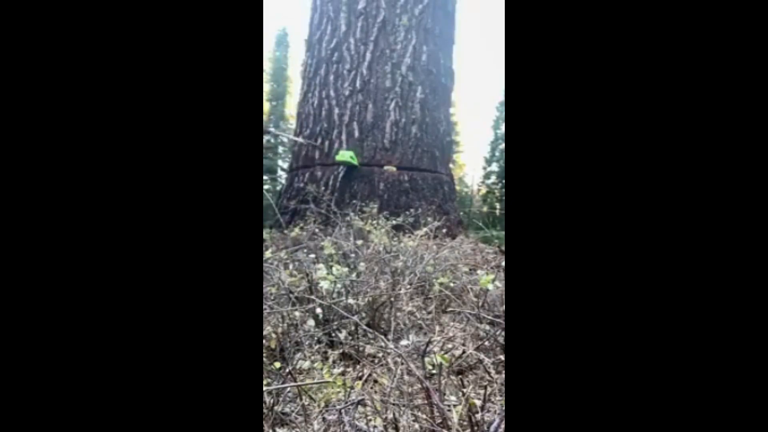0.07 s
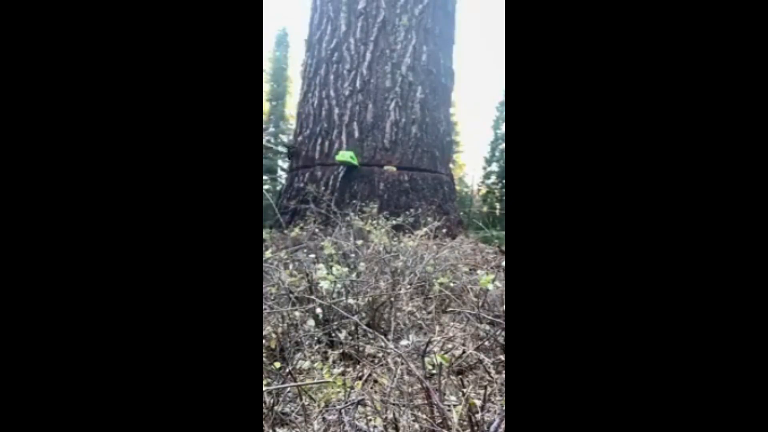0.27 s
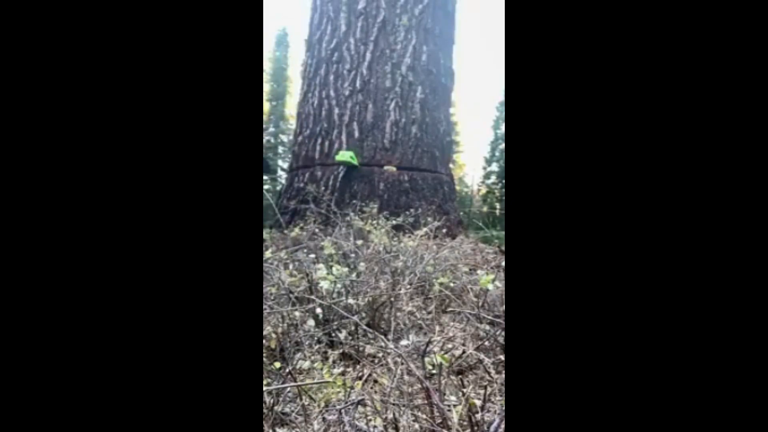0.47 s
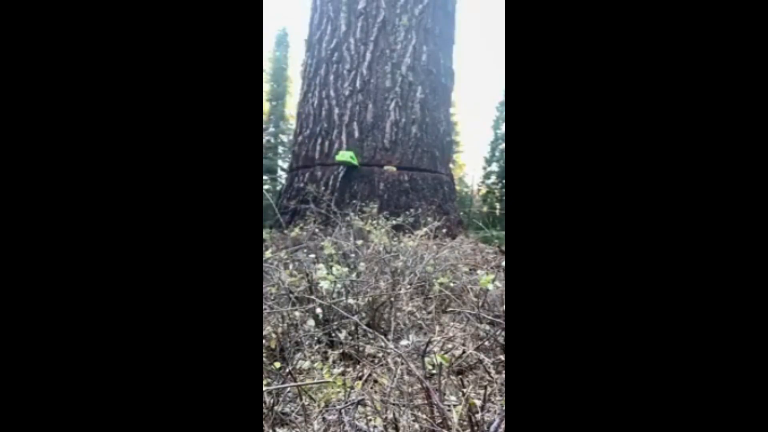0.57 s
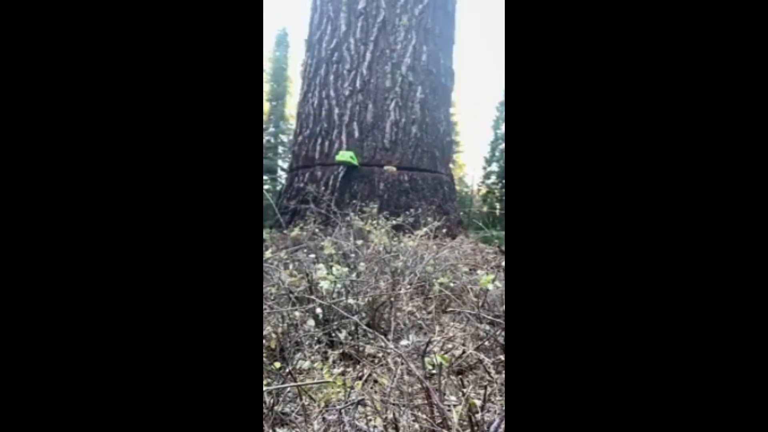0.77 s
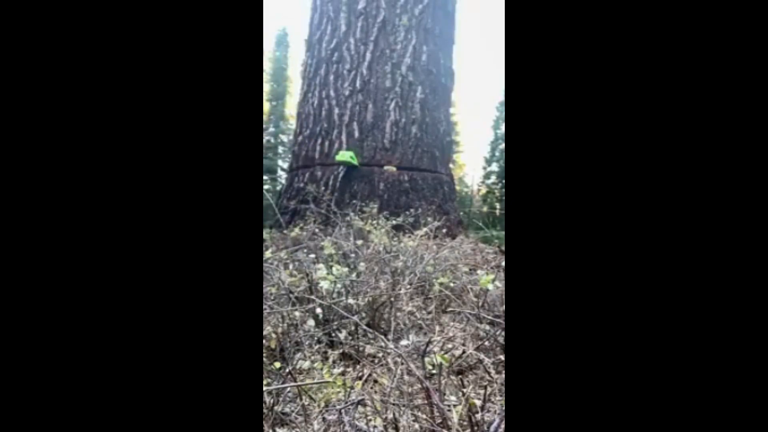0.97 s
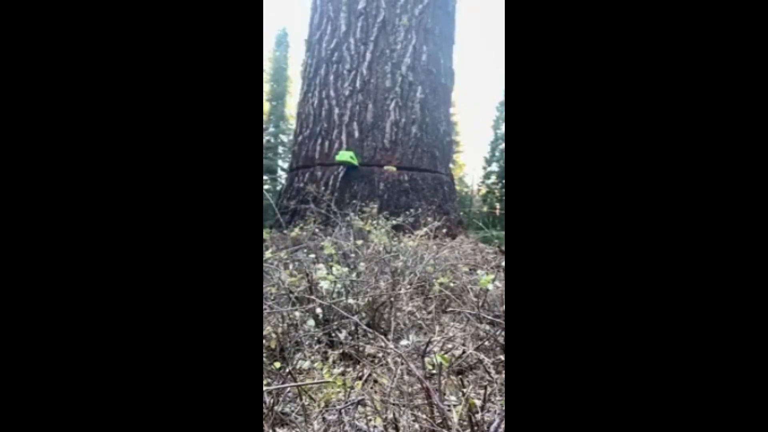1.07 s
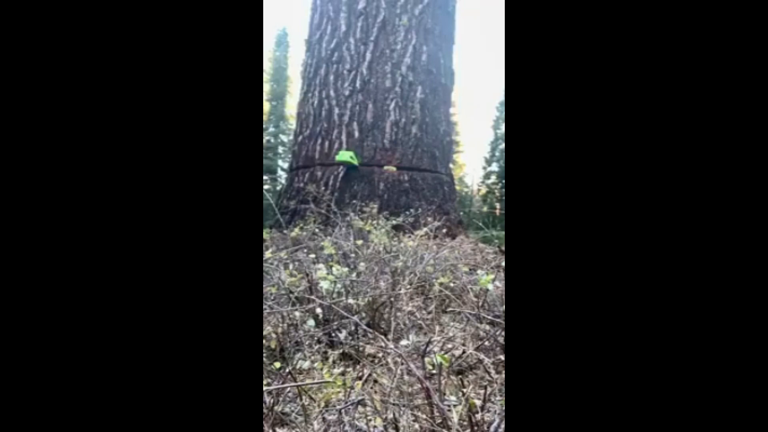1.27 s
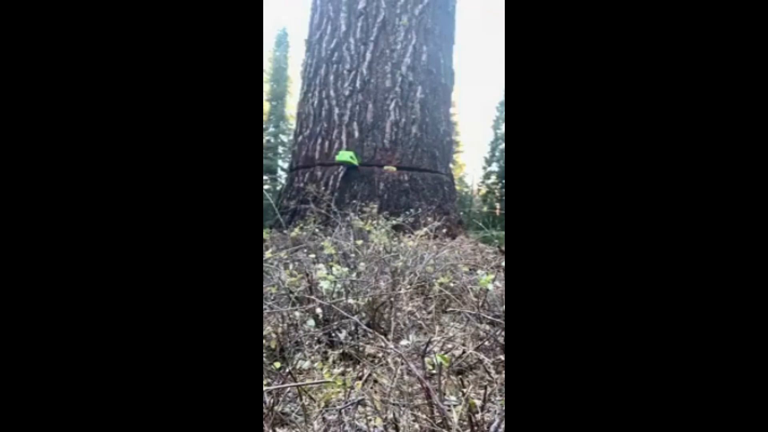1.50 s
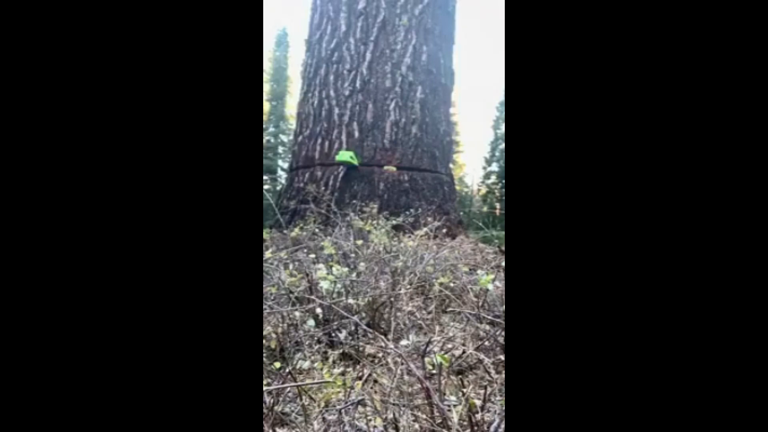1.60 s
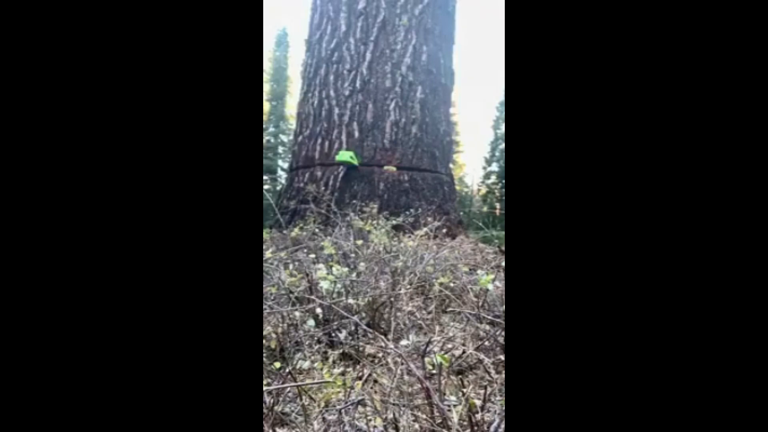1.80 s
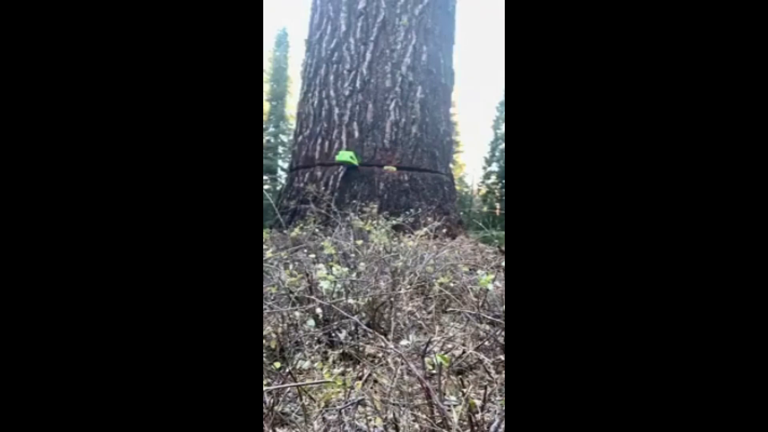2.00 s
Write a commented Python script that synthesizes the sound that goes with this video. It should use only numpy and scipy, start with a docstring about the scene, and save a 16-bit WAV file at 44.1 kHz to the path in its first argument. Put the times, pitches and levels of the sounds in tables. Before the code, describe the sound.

Outdoors in quiet forest, one loud metallic whack pounds a wedge into a saw cut, with woody knock and low thud. The echo fades over about a second, then nearby rustling, small knocks and a twig snap follow.

```python
"""Axe blow on a felling wedge

One hard axe blow drives a wedge into the saw cut of a big tree. Decaying sine modes make the ringing
steel, the hollow knock of the trunk and the deep thump; shaped noise bursts make the wedge bite and judder.
Decaying noise convolved with the blow gives the forest echo. Then brush and clothing rustle nearby as
swelling noise, with a few resonant knocks and a twig snap, over quiet air."""
import sys
import numpy as np
from scipy import signal
from scipy.fft import rfft, irfft, next_fast_len
from scipy.io import wavfile
from scipy.ndimage import map_coordinates

SR = 44100
rng = np.random.default_rng(int(sys.argv[2]) if len(sys.argv) > 2 else 0)


def file_out(sig):
    """Save sig as 16-bit WAV at sys.argv[1]."""
    # one column per channel
    cols = np.atleast_2d(sig).T
    # limit, then scale
    lim = np.clip(cols, -1, 1)
    pcm = np.round(lim * 32767).astype(np.int16)
    wavfile.write(sys.argv[1], SR, pcm)


N = 90404
T = np.arange(N) / SR  # s
BLOW_S = 0.229  # the head meets the wedge
SNAP_S = 1.4848  # the twig breaks

# Head driving the wedge in. Each row: start in seconds, relative level in dB.
BITES = [(.2275, -25), (.233, -8.5), (.239, -3.5), (.243, -0.5), (.2487, 4), (.252, 2)]
# Strokes of rustling brush and clothing. Each row: peak, rise width and fall width in seconds,
# hiss level and dull scuff level in dB.
RUSTLES = [(0.817, .035, 0.057, -58.5, -66), (1.05, 0.06, 0.056, -62, -61.5),
           (1.159, 0.025, 0.034, -65.5, -58.5), (1.29, 0.11, .06, -63, -74),
           (1.425, 0.036, 0.021, -50.5, -51), (1.518, 0.027, 0.08, -49, -44.5),
           (1.643, 0.045, 0.046, -46, -44.5), (1.743, 0.01993, .055, -62.5, -60),
           (1.94, 0.0154, 0.023, -61, -68), (1.995, 0.0126, 0.04, -50, -59.5),
           (2.034, 0.0182, 0.031, -53.5, -45)]


def amp(db):
    """Decibels to gain."""
    return 10 ** (np.asarray(db) / 20)


def unit(x):
    """Scale to rms 1."""
    return x / np.sqrt(np.mean(np.abs(x) ** 2) + 1e-20)


def along(points, hz):
    """Interpolate (Hz, value) points on a log frequency axis."""
    point_hz, value = np.transpose(points)
    return np.interp(np.log(hz + 1), np.log(point_hz + 1), value)


def wobble(knots_per_s):
    """Smooth random curve through normally distributed knots."""
    return map_coordinates(rng.standard_normal(4096), [T * knots_per_s], mode="wrap")


def filtered(x, response):
    """Multiply the spectrum of x by a response of frequency, zero-padded."""
    size = next_fast_len(N + SR // 2)
    spectrum = rfft(x, size) * response(np.fft.rfftfreq(size, 1 / SR))
    return irfft(spectrum, size)[:N]


def noise(colour):
    """Noise of rms 1 with a (Hz, dB) spectrum."""
    return unit(filtered(rng.standard_normal(N), lambda hz: amp(along(colour, hz))))


def resonate(x, hz, q):
    """Pass x twice through one broad resonance, then scale to rms 1."""
    def response(f):
        damping = 1j * f * hz / q
        return (damping / (hz * hz - f * f + damping)) ** 2

    return unit(filtered(x, response))


def envelope(start_s, attack_s, hold_s, t60_s):
    """Straight rise, hold, exponential release."""
    t = T - start_s
    rise = np.clip(t / attack_s, 0, 1)
    return rise * amp(-60 * np.maximum(t - attack_s - hold_s, 0) / t60_s)


def ring(modes, start_s, attack_s, hold_s, waver_rad, waver_per_s):
    """Decaying sine modes (Hz, dB, t60 s) whose phases waver at random."""
    total = 0
    for hz, db, t60_s in modes:
        cycles = hz * (T - start_s) + rng.random()
        phase = 2 * np.pi * cycles + waver_rad * wobble(waver_per_s)
        total = total + amp(db) * envelope(start_s, attack_s, hold_s, t60_s) * np.sin(phase)
    return total


def cracks(rows, t60_s, attack_s):
    """Joint envelope of a run of short cracks, summed in power."""
    power = sum((amp(db) * envelope(s, attack_s, 0.0013, t60_s)) ** 2 for s, db in rows)
    return np.sqrt(power)


def strokes(levels_db):
    """Gain that swells and fades as a lopsided bell with each stroke of movement."""
    power = 0
    for (peak_s, rise_s, fall_s, *_), db in zip(RUSTLES, levels_db):
        width_s = np.where(T < peak_s, rise_s, fall_s)
        power = power + amp(db) ** 2 * np.exp(-((T - peak_s) / width_s) ** 2)
    return np.sqrt(power)


def head_ring():
    """Steel axe head rings in short modes whose phases waver at random."""
    # Modes of the axe head. Each row: frequency in Hz, level in dB, t60 in seconds.
    head_modes = [(2007.5, -19.5, 0.02), (2381, -24.5, 0.093), (2690, -23.5, .05), (2720, -20, 0.071),
                  (2891, -20, 0.13), (3018, -18.5, .045), (3115, -15, .045), (3440, -24.5, .16),
                  (4750, -32, .08), (5230, -32.5, 0.027), (5690, -33, .05), (6260, -32, 0.04)]
    return ring(head_modes, BLOW_S, attack_s=0.012, hold_s=0.007, waver_rad=0.45, waver_per_s=200)


def wedge_ring():
    """Struck wedge rings in modes that mostly outlast those of the head."""
    # Modes of the wedge. Each row: frequency in Hz, level in dB, t60 in seconds.
    wedge_modes = [(1717, -30, 0.067), (1788, -32.5, 0.27), (1842, -25.5, .2), (1923, -24.5, 0.18),
                   (2063, -23, .16), (2287, -33, .12), (3550, -27.5, 0.092), (3946, -38, 0.19),
                   (3957, -38, 0.32)]
    return ring(wedge_modes, BLOW_S, attack_s=0.018, hold_s=0.03, waver_rad=0.25, waver_per_s=120)


def wedge_bite():
    """Head drives the wedge in: a run of noise cracks, each with a bright splintering edge."""
    # Spectrum of the bite. Each row: frequency in Hz, relative density in dB per Hz.
    bite_colour = [(59, -51.5), (100, -19), (253, -25.5), (640, -11.5), (936, -18.5), (1110, -10.5),
                   (1400, -29.5), (1800, -4), (2270, -10.5), (3050, -1), (4100, -17.5), (7100, -27),
                   (8230, -31), (9950, -26.5), (15500, -31)]
    # Spectrum of the bright edge. Each row: frequency in Hz, relative density in dB per Hz.
    splinter_colour = [(3900, -23.5), (4800, -0.5), (6200, 11), (10000, -7.5), (15000, -13)]
    bite = amp(-10) * cracks(BITES, t60_s=0.022, attack_s=0.0016) * noise(bite_colour)
    splinter = amp(-34) * cracks(BITES, t60_s=0.11, attack_s=0.0015) * noise(splinter_colour)
    return bite + splinter


def wedge_judder():
    """Wedge judders to rest in the wood: a run of sharp noise cracks."""
    # Jolts of the wedge. Each row: start in seconds, relative level in dB.
    jolts = [(.262, -8.5), (.2695, 3), (.274, -9.5), (.281, -0.5), (.285, 2.5), (.292, -0.5), (.298, -4)]
    # Spectrum of a jolt. Each row: frequency in Hz, relative density in dB per Hz.
    jolt_colour = [(59, -36), (100, -9), (326, -23.5), (654, -2), (879, -14), (1180, -18), (1340, -18.5),
                   (1920, -2), (2520, -13), (3690, -10), (4460, -28), (4860, -16.5), (5170, -23.5),
                   (7730, -25), (15500, -41)]
    return amp(-16) * cracks(jolts, t60_s=0.04, attack_s=0.00054) * noise(jolt_colour)


def trunk_knock():
    """Hollow trunk modes sound in rising order as the wedge tightens."""
    # Modes of the trunk. Each row: start in seconds, frequency in Hz, level in dB, t60 in seconds.
    trunk_modes = [(.262, 482, -33.5, 0.036), (.268, 559.8, -21, .08), (.27, 612, -30, 0.2),
                   (.276, 667.5, -20.5, .06), (.288, 726, -27.5, 0.027)]
    return sum(ring([mode], start_s, attack_s=0.0047, hold_s=0.02, waver_rad=0.25, waver_per_s=100)
               for start_s, *mode in trunk_modes)


def thump():
    """The whole stem and its roots shudder in low swells of rising pitch."""
    # Swells of the thump. Each row: start in seconds, pitch in Hz, level in dB, hold in seconds.
    swells = [(0.267, 56.7, -21, 0.023), (0.341, 60.8, -33, 0.048), (.43, 67.3, -52, 0.046),
              (0.513, 68.3, -50.5, 0.052)]
    t60_s = 0.16
    return sum(ring([(hz, db, t60_s)], start_s, attack_s=0.008, hold_s=hold_s, waver_rad=0.3, waver_per_s=35)
               for start_s, hz, db, hold_s in swells)


def forest(x, build_s=0.024, patchy_db=-1.5):
    """Echoes from many trunks build up and die away, the high treble sooner than the mids."""
    # Spectrum of the echo. Each row: frequency in Hz, relative gain in dB.
    echo_colour = [(60, -12), (160, -10), (300, 0.5), (500, -8), (680, -10), (900, -2), (1400, 3),
                   (1750, -1.5), (2200, -11.5), (3000, -12), (3600, -5), (4050, 0), (4600, -4.5),
                   (9000, -2.5), (15000, -11)]
    # Decay of the echo. Each row: frequency in Hz, t60 in seconds.
    echo_decay = [(60, 1), (600, 1.1), (1800, 1.276), (3500, 0.91), (5500, 0.74), (12000, 0.85)]
    hz, t, bands = signal.stft(rng.standard_normal(N), SR, nperseg=256)
    decay = amp(-60 * t / along(echo_decay, hz)[:, None])
    tail = signal.istft(bands * decay, SR, nperseg=256)[1][:N]
    tail = tail * np.clip(T / build_s, 0, 1) * amp(patchy_db * wobble(40))
    echo = signal.fftconvolve(x, tail / np.linalg.norm(tail))[:N]
    return amp(-12) * filtered(echo, lambda f: amp(along(echo_colour, f)))


def rustle(hiss_grain_db=2, scuff_grain_db=3):
    """Grainy hiss, dull scuffing and tiny clicks of small stems, all following the strokes."""
    # Spectrum of the hiss. Each row: frequency in Hz, relative density in dB per Hz.
    hiss_colour = [(1180, -14), (2000, 0.5), (2330, -4.5), (2840, -18), (3740, -4), (4670, -11.5),
                   (6360, -5), (7170, -7), (8730, -3), (9840, -8.5), (11800, -14.5), (14200, -8.5),
                   (15500, -20.5)]
    # Spectrum of the dull scuff. Each row: frequency in Hz, relative density in dB per Hz.
    scuff_colour = [(15, -49), (25, -2.5), (98, 10.5), (213, -1.5), (282, 1), (413, 0.5), (655, -4),
                    (1290, -6.5), (2130, -16.5), (3000, -53), (3900, -48), (6600, -120)]
    clicks_per_s = 400
    *_, hiss_db, scuff_db = np.transpose(RUSTLES)
    hiss = unit(noise(hiss_colour) * amp(hiss_grain_db * wobble(700)))
    scuff = unit(noise(scuff_colour) * amp(scuff_grain_db * wobble(100)))
    clicks = (rng.random(N) < clicks_per_s / SR) * rng.standard_normal(N)
    crackle = amp(-7.5) * resonate(clicks, hz=915, q=0.97)  # level relative to the scuff
    return strokes(hiss_db) * hiss + strokes(scuff_db) * (scuff + crackle)


def twig():
    """A twig snaps as a noise burst over a soft thud of low ground modes."""
    # Spectrum of the snap. Each row: frequency in Hz, relative density in dB per Hz.
    snap_colour = [(290, -46), (500, -28), (716, -11), (1800, -5.5), (2650, -22), (3580, -7.5),
                   (4570, -12.5), (6000, 0), (6740, -17.5), (8480, -11.5), (15500, -31.5)]
    # Modes of the ground under the snap. Each row: frequency in Hz, level in dB, t60 in seconds.
    ground_modes = [(42.2, -34.5, 0.28), (111.6, -33, 0.11)]
    burst = envelope(SNAP_S, attack_s=0.00013, hold_s=0.00086, t60_s=0.038)
    snap = amp(-26) * burst * noise(snap_colour)
    thud = ring(ground_modes, SNAP_S, attack_s=0.0052, hold_s=0.0052, waver_rad=0.6, waver_per_s=100)
    return snap + thud


def knocks():
    """Short dead knocks in the brush: noise bursts, each in one broad resonance."""
    # Knocks in the brush. Each row: start in seconds, level in dB, centre in Hz, t60 in seconds.
    brush_knocks = [(1.350, -48.5, 1760, 0.014), (1.360, -51, 1680, 0.024), (1.411, -33, 930, 0.033),
                    (1.411, -48.5, 280, .06), (1.488, -26, 290, 0.037), (1.519, -50, 280, 0.062),
                    (1.732, -39, 470, 0.037), (1.795, -57, 870, 0.019), (1.986, -48, 1900, .02),
                    (2.027, -44, 590, 0.03)]
    return sum(amp(db) * envelope(start_s, 0.00078, 0.00061, t60_s)
               * resonate(rng.standard_normal(N), hz, q=1.0)
               for start_s, db, hz, t60_s in brush_knocks)


def air():
    """Quiet forest air: steady noise, weak in the treble."""
    # Spectrum of the air. Each row: frequency in Hz, relative density in dB per Hz.
    air_colour = [(20, -6), (45, 2), (110, -4), (250, -12), (420, -5), (700, -5), (1100, -9), (1500, -14),
                  (2000, -12), (2800, -21.5), (5000, -25), (8000, -26.5), (15000, -37)]
    return amp(-63.5) * noise(air_colour)


def scene():
    """The blow and its echo, the movement nearby and the quiet forest air."""
    blow = head_ring() + wedge_ring() + wedge_bite() + wedge_judder() + trunk_knock()
    strike = blow + thump()
    movement = rustle() + twig() + knocks()
    return (strike + forest(strike) + movement + air())[None]


def record(dry):
    """The recorder rounds off the highest peaks and cuts the top of the band."""
    ceiling, top_hz, slope_hz = 0.95, 15550, 500
    held = dry[0] / (1 + np.abs(dry[0] / ceiling) ** 6) ** (1 / 6)
    return filtered(held, lambda hz: np.clip((top_hz - hz) / slope_hz + 0.5, 0, 1))[None]


dry = scene()
out = record(dry)
file_out(out)
```